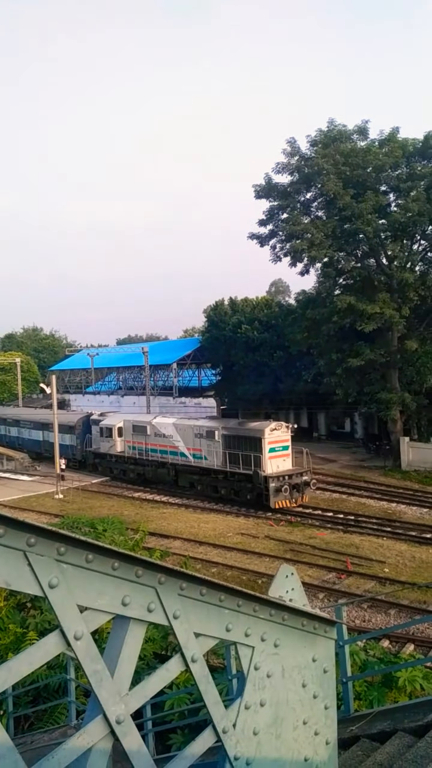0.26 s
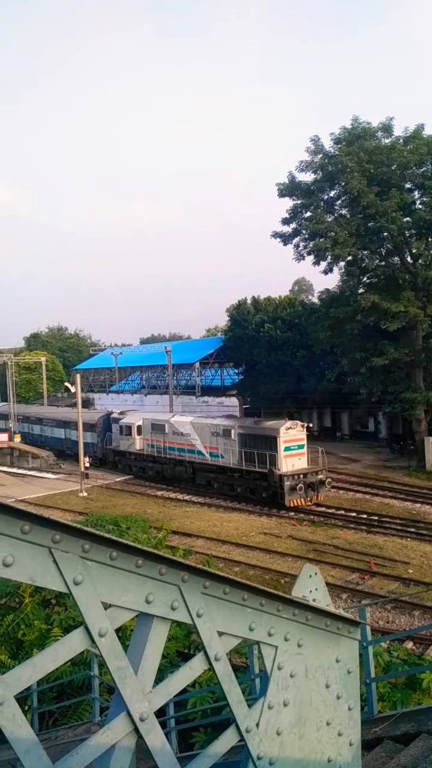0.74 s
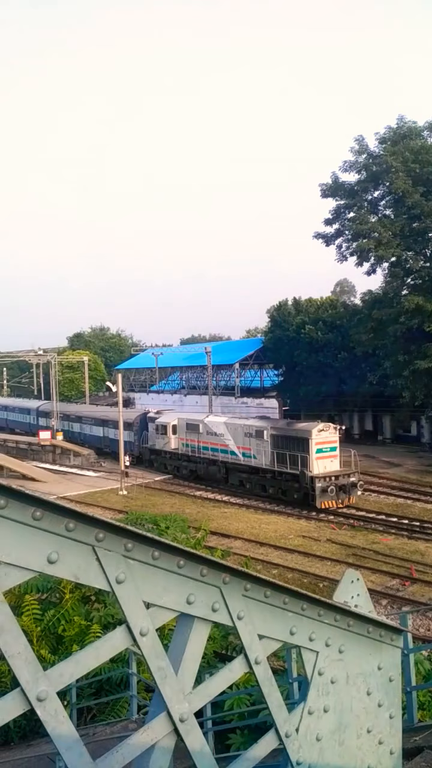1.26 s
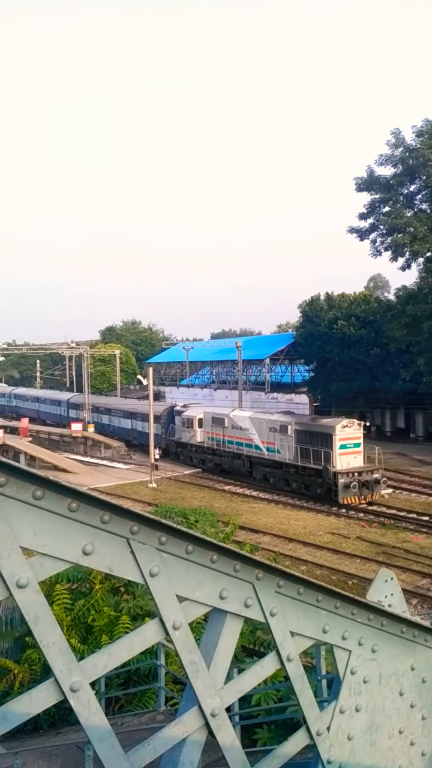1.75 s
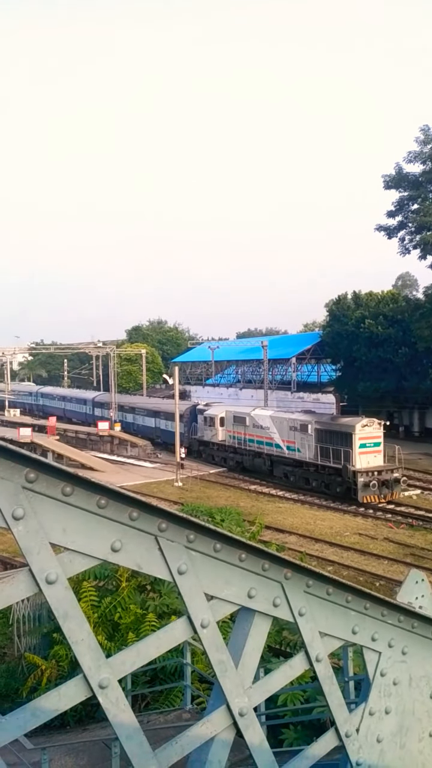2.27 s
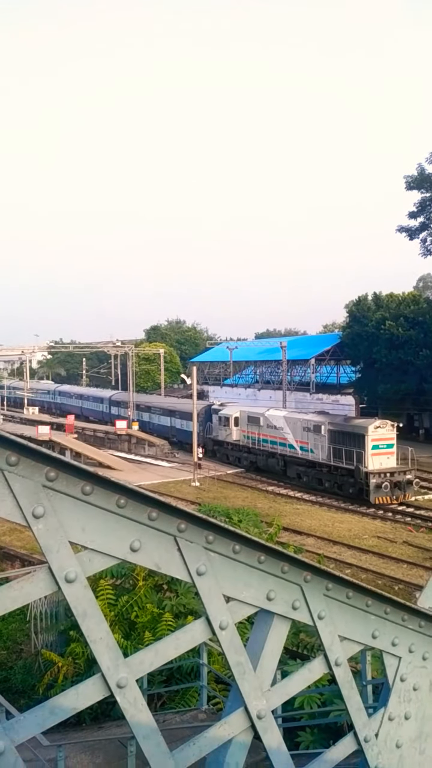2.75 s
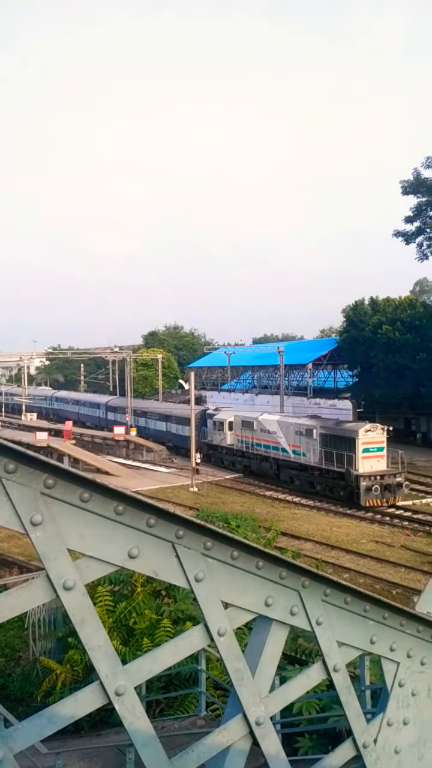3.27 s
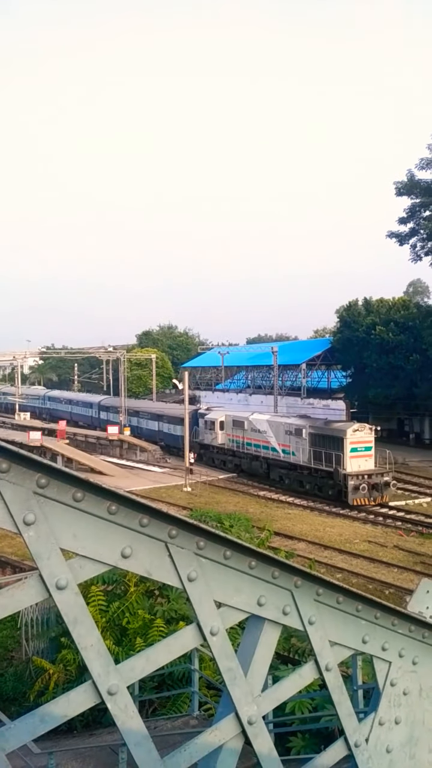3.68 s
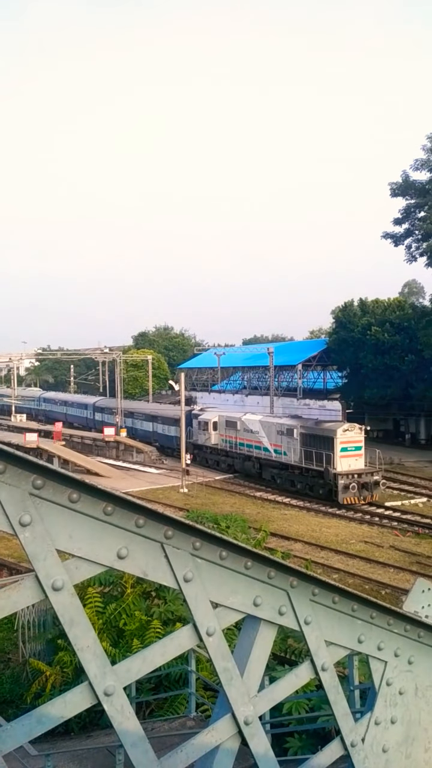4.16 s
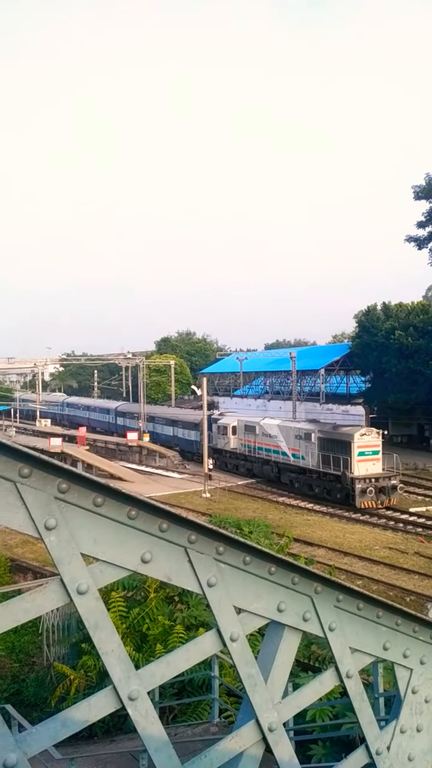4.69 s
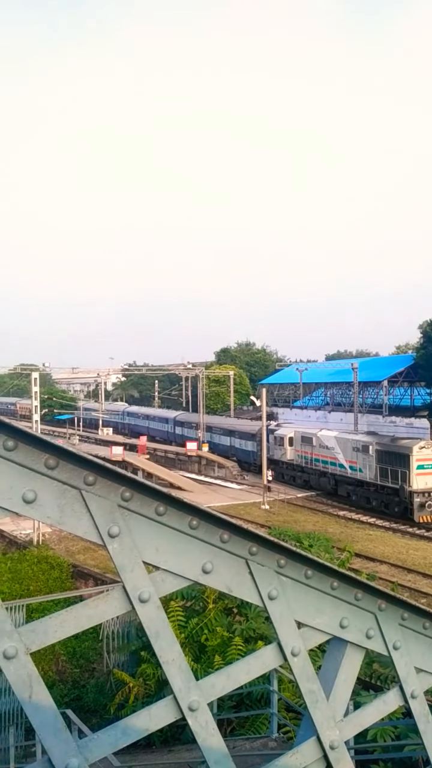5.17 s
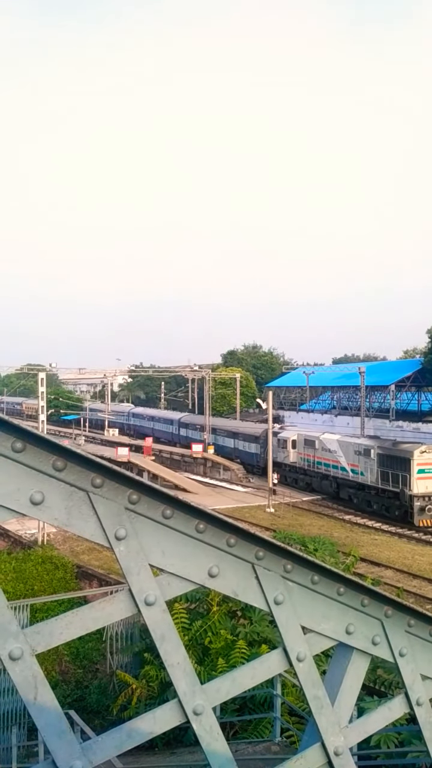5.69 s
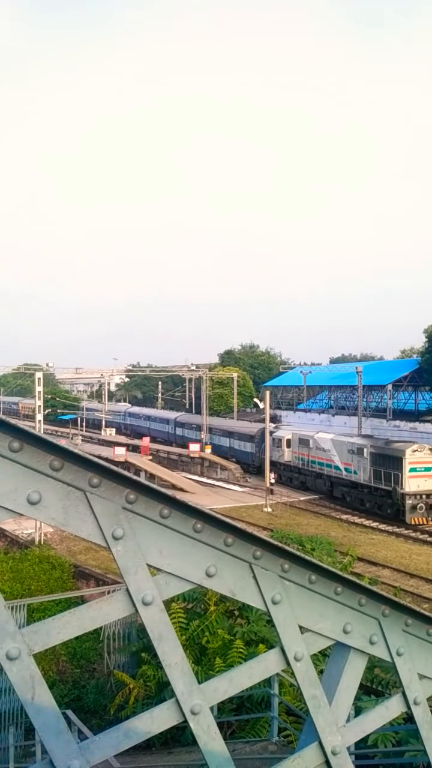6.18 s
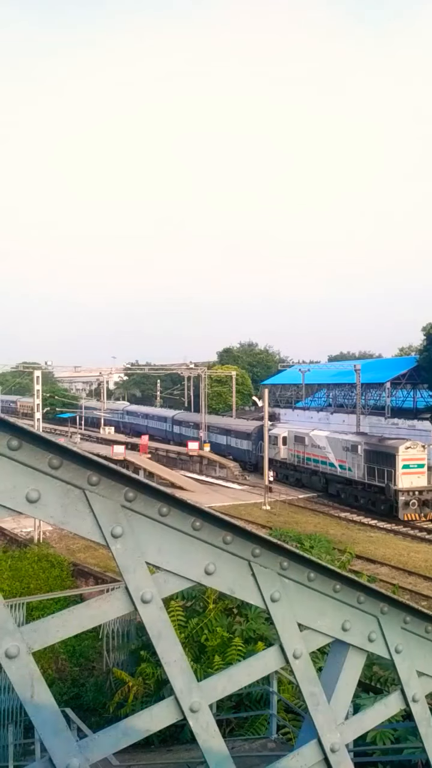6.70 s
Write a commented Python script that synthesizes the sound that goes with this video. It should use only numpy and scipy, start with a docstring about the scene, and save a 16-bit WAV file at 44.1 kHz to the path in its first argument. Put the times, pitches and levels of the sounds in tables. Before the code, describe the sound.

Outdoors at a station yard, heard from a footbridge some way off, a large diesel engine idles with a deep, uneven throb, small air spits and light rattles. A hoarse bird chirps briefly near the start. Past the middle a brake valve ticks open and a bright, loud air hiss swells, holds about a second, then cuts back to a steady weaker bleed until the end.

```python
"""Idling diesel locomotive with a brake-valve air dump

A big two-stroke diesel idles in a station yard, some way below a footbridge: noise puffs, exhaust
resonances and crank orders throb, air spits twice a turn, and something rattles once a turn.
A bird chirps in hoarse sine glides. Then a brake valve cracks open, dumps air in a loud hiss of
coloured noise and falls back to a bleed; fans and the far town are a wavering wash of noise."""
import sys
import numpy as np
from scipy import signal
from scipy.fft import rfft, irfft
from scipy.io import wavfile
from scipy.ndimage import uniform_filter1d

SR = 44100
rng = np.random.default_rng(int(sys.argv[2]) if len(sys.argv) > 2 else 0)


def store_wav(level_fs):
    """Save 16-bit WAV to argv[1]."""
    pcm = np.round(np.clip(np.atleast_2d(level_fs), -1, 1) * 32767)
    wavfile.write(sys.argv[1], SR, pcm.T.astype(np.int16))


N = 305613
T = np.arange(N) / SR
FREQS = np.fft.rfftfreq(N, 1 / SR) + 1e-3  # the offset keeps the logarithm finite at 0 Hz

CRANK_HZ = 3.3315
BEATS_S = (.072, .228)  # the two hard exhaust beats of the first turn
CRACK_S = 4.3835  # the brake valve leaves its seat
VALVE_TRAVEL_S = .066


def undb(db):
    """Decibels to gain."""
    return 10 ** (np.asarray(db) / 20)


def unit(x):
    """Scale to an rms of 1."""
    return x / np.sqrt(np.mean(x ** 2))


def noise():
    """White noise."""
    return rng.standard_normal(N)


def curves(table):
    """Each column of a table, joined by straight lines in time."""
    s, *columns = np.transpose(table)
    return [np.interp(T, s, c) for c in columns]


def walk(rate):
    """Smooth random wander with a spread near 1, from `rate` fresh values per second."""
    k = int(SR / rate)
    steps = np.repeat(rng.standard_normal(N // k + 1), k)
    smooth = uniform_filter1d(uniform_filter1d(steps, k), k)
    return 1.3 * smooth[:N]


def colour(x, points, ripple=()):
    """Shape a sound by a smooth spectrum with local peaks and dips, to an rms of 1."""
    hz, db = np.transpose(points)
    shape_db = np.interp(np.log(FREQS), np.log(hz), db)
    for centre, width, lift in ripple:
        shape_db = shape_db + lift / (1 + (2 * (FREQS - centre) / width) ** 2)
    return unit(irfft(rfft(x) * undb(shape_db), N))


def split(x, edges_hz):
    """Cut a sound into adjoining bands."""
    band = np.searchsorted(edges_hz, FREQS)
    spectrum = rfft(x)
    return [irfft(spectrum * (band == k), N) for k in range(len(edges_hz) + 1)]


def echoes(x, t60, wet_db):
    """Add the scatter from coaches, roofs and trees as a decaying noise tail."""
    t = T[:SR]
    tail = rng.standard_normal(SR) * undb(-60 * t / t60) * (t > .012)
    tail /= np.linalg.norm(tail)
    return x + undb(wet_db) * signal.fftconvolve(x, tail)[:N]


def every_turn(at_s):
    """The times at which the crankshaft comes round to the same angle."""
    return np.arange(at_s, T[-1], 1 / CRANK_HZ)


def once_a_turn(at_s, width_s, scatter_db):
    """A swell at the same crank angle in every turn, its size drawn afresh each time."""
    turns = (T - at_s) * CRANK_HZ + .5
    size = undb(scatter_db * rng.standard_normal(int(N / SR * CRANK_HZ) + 4))
    from_peak_s = (turns % 1 - .5) / CRANK_HZ
    return size[np.floor(turns).astype(int) + 1] * np.exp(-(from_peak_s / width_s) ** 2)


def bursts(source, table, width, skirt_db, decay_s):
    """Short bursts of a noise, each strongest in a band of its own; width is a share of the centre."""
    out = np.zeros(N)
    t = T[:SR // 4]
    hz = np.fft.rfftfreq(len(t), 1 / SR)
    for s, db, held, centre_hz in table:
        span = slice(int(s * SR), int(s * SR) + len(t))
        band = undb(skirt_db) + np.exp(-((hz / centre_hz - 1) / width) ** 2)
        burst = unit(irfft(rfft(source[span]) * band, len(t)))
        attack = 1 - np.exp(-t / 0.0011)
        release = np.exp(-np.maximum(t - held, 0) / decay_s)
        out[span] += undb(db) * burst * attack * release
    return out


def exhaust(count=16, ragged=0.79, puff_s=0.0074):
    """Sixteen cylinders fire once a turn, each with its own puff; two stretches of the turn beat harder."""
    # exhaust stack and engine body: f/Hz, spectral level/dB
    stack = [(30, -37), (41, -10), (50, 8), (72, -21), (88, 6), (106, -11.5), (145, -15.5), (180, 9.5),
             (200, -1), (270, -8), (312, -4.5), (370, -11), (620, -12), (2000, -87)]
    t = T[:SR // 16]
    puffs = rng.standard_normal((count, len(t)))
    gas = np.zeros(N + len(t))
    starts = np.arange(0, N, SR / CRANK_HZ / count).astype(int)
    for k, start in enumerate(starts):
        # the cylinder's own waveform, made ragged by fresh noise at each firing
        puff = puffs[k % count] + ragged * rng.standard_normal(len(t))
        size = undb(1.5 * rng.standard_normal())
        gas[start:start + len(t)] += size * puff * np.exp(-t / puff_s)
    first_beat = .5 * once_a_turn(BEATS_S[0], .025, 1.5)
    second_beat = .35 * once_a_turn(BEATS_S[1], .025, 1.5)
    lope = 1 + first_beat + second_beat
    easing = undb(-.3 * T)  # the exhaust slowly grows quieter
    return undb(-51.5) * easing * colour(gas[:N] * lope, stack)


def thumps():
    """Each beat swells and dies in the three resonances of the exhaust; now and then one is far heavier."""
    # exhaust resonances rung by a firing: nominal f/Hz, swell/s, decay/s
    modes = [(55.6, 0.0084, 0.012), (104.3, 0.014, 0.0048), (185.8, 0.0078, 0.0084)]
    # the heaviest firings: t/s, top resonance level/dB, depth of the lower ones against the top/dB
    heavy = [(.236, -38.5, -20), (.371, -40, 1), (.508, -49, 5), (.669, -40.5, 1), (1.275, -43, -1),
             (1.438, -35, -14), (1.729, -32, -24), (1.869, -35.5, -2), (2.174, -36.5, -20),
             (2.771, -34.5, -16), (3.373, -43, 5), (3.976, -43.5, 4), (4.461, -41, -16), (4.88, -39.5, -13),
             (5.282, -37.5, -22), (6.385, -37.5, -16), (6.798, -41, -14)]
    beat_db, beat_depth_db, scatter_db = -49.5, -4, 2.5  # an ordinary beat
    boom_db = -6  # lowest resonance against the middle one
    beats = np.concatenate([every_turn(s) for s in BEATS_S])
    scatter = rng.standard_normal((len(beats), 2))
    ordinary = [(s, beat_db + scatter_db * size, beat_depth_db + scatter_db * deep)
                for s, (size, deep) in zip(beats, scatter)]
    out = np.zeros(N)
    for s, top_db, depth_db in [*heavy, *ordinary]:
        near = np.abs(T - s) < .1
        t = T[near] - s
        levels_db = top_db + np.array([depth_db + boom_db, depth_db, 0])
        draws = rng.standard_normal((len(modes), 2))
        for (hz, swell, decay), db, (detune, phase) in zip(modes, levels_db, draws):
            # hypot rounds the peak between swell and decay
            ring = np.exp(-np.hypot(t, .004) / np.where(t < 0, swell, decay))
            tone = np.cos(2 * np.pi * hz * (1 + 0.035 * detune) * t + phase)
            out[near] += undb(db) * ring / ring.max() * tone
    return out


def hum():
    """Orders of the crankshaft hum on, swelling twice a turn."""
    # engine tones: multiple of the crank rate, peak level between swells/dB, throb depth
    orders = [(15, -59, .2), (26, -63, .5), (31, -62, .8), (54, -58.5, 1.1)]
    beat = sum(once_a_turn(s, .035, 2) for s in BEATS_S)
    angle = 2 * np.pi * CRANK_HZ * (T + .0004 * walk(5))  # the timing wanders slightly
    out = np.zeros(N)
    for k, db, depth in orders:
        tone = np.sin(k * angle + 2 * np.pi * rng.random())
        out += undb(db) * (1 + depth * beat) * tone
    return out


def spits():
    """Air escapes twice a turn as coloured noise; now and then a spit is longer and louder."""
    # colour of a spit of air: f/Hz, spectral level/dB
    air_colour = [(900, 8), (1400, 6), (2500, 9), (3600, 1), (4900, 3.5), (7400, 3.5), (8800, -11.5),
                  (11000, -3), (12500, -24), (15500, -22)]
    # the strongest spits: t/s, level/dB, held/s, centre f/Hz
    strong = [(.258, -53, .022, 6660), (.362, -51.5, .03, 5960), (.398, -48, .04, 6400),
              (.86, -56, .034, 4400), (1.752, -57, .012, 4600), (2.198, -56.5, .03, 5560),
              (2.635, -53.5, .058, 5100), (2.793, -49.5, .025, 6750), (2.952, -53, .018, 5160),
              (3.552, -46.5, .0081, 5360), (3.853, -52.5, .013, 7460), (3.996, -54, .015, 7000),
              (4.162, -55, .013, 5540)]
    lag_s = .036  # after each of the two exhaust beats of a turn
    swells = sum(once_a_turn(s + lag_s, .016, scatter_db=1.5) for s in BEATS_S)
    regular = undb(-57.5) * colour(noise(), air_colour) * swells
    clear = bursts(colour(noise(), air_colour), strong, width=0.24, skirt_db=-11.5, decay_s=.02)
    return echoes(regular + clear, 0.37, -9)


def rattles(count=60):
    """Noise bursts: a light rattle in every turn, a few clear ones and many faint, softened by distance."""
    # the clearest rattles: t/s, level/dB, held/s, centre f/Hz
    clear = [(.215, -60, .085, 2720), (.255, -52, .01, 1460), (.37, -55.5, .11, 3000),
             (.56, -55, .014, 2870), (.858, -54, .019, 2070), (1.425, -53.5, .023, 2180),
             (2.68, -59, .044, 1090), (3.174, -52, .032, 516), (3.855, -56, .025, 1480)]
    last_s = T[-1] - .3
    faint = [(s * last_s, -64.5 + 6 * size, .015, 400 * 6 ** pitch)
             for s, size, pitch in rng.random((count, 3))]
    lag_s, level_db, held_s, centre_hz = .025, -64, .016, 1500  # follows the second beat of a turn
    regular = [(s, level_db + 2 * rng.standard_normal(), held_s, centre_hz)
               for s in every_turn(BEATS_S[1] + lag_s) if s < last_s]
    dry_rattles = bursts(noise(), [*clear, *regular, *faint], width=.22, skirt_db=-42, decay_s=.014)
    return echoes(dry_rattles, .4, -8)


def opening(start_s, build_s):
    """Flow from 0 to 1: the valve lifts, then pressure builds in the vent pipe."""
    t = np.maximum(T - start_s, 0)
    return np.minimum(t / VALVE_TRAVEL_S, 1) * (1 - np.exp(-t / build_s))


def gush(db, start_s, build_s, cut_s, fall_db_per_s):
    """One part of the blast builds up, holds, and falls away when the valve cuts it off."""
    fall_db = fall_db_per_s * np.maximum(T - cut_s, 0)
    return opening(start_s, build_s) * undb(db - fall_db)


def air_release():
    """A turbulent jet is noise of a rippled colour; its roar stops first as the valve closes to a bleed."""
    # colour of the open valve, then of the bleed: f/Hz, spectral level/dB
    jet = [(900, -48.5), (1120, -46), (1280, -25.5), (2100, -26), (3000, -20.5), (4300, -15.5),
           (5600, -10.5), (6400, 3.2), (7700, 5.5), (8500, -5.5), (9300, -14), (10700, -12.5),
           (11800, -21.5), (15600, -22.5)]
    bleed_colour = [(800, -21), (1120, -21), (1300, -19), (2100, -15), (3000, -17), (4300, -13.5),
                    (5600, -11.5), (6400, 4), (7700, 6.5), (8500, -1.5), (9300, -8), (10600, -8.5),
                    (11800, -15.5), (15600, -17.5)]
    # fixed ripple in the colour of the hiss, peaks and dips: f/Hz, width/Hz, lift or dip/dB
    hiss_ripple = [(1326, 85, 8.5), (1613, 254, 13), (1860, 80, 7), (2094, 84, 7), (2390, 216, 10),
                   (2647, 55, 10), (2866, 97, 10), (3060, 230, 9.5), (3223, 75, 6.5), (3510, 153, 12.5),
                   (3663, 160, 7.5), (3935, 340, 9), (4227, 52, 7), (4374, 290, 12), (4655, 77, 8.5),
                   (4930, 280, 9.5), (5396, 320, 10.5), (5670, 335, 7.5), (6090, 70, 8.5), (6490, 35, 7),
                   (6330, 35, 4), (7140, 76, 3), (7650, 50, 2), (8768, 50, -6), (10100, 81, -11),
                   (9800, 40, -10), (10200, 310, 0)]
    # the bleed once the blast is over: t/s, level/dB
    bleed_level = [(5.7, -35), (6.03, -36.3), (6.42, -33.8), (6.65, -34), (6.93, -35.3)]
    low, body, hiss, sizzle = split(colour(noise(), jet, hiss_ripple), [2500, 5100, 8900])
    # the largest eddies make the lowest band the most ragged
    roar = unit(low * undb(1.4 * walk(28)) + body * undb(.7 * walk(50)))
    blast = roar * gush(db=-27.3, start_s=4.402, build_s=.17, cut_s=5.565, fall_db_per_s=220)
    blast += unit(hiss) * gush(db=-17.2, start_s=4.392, build_s=.27, cut_s=5.62, fall_db_per_s=300)
    blast += unit(sizzle) * gush(db=-29.5, start_s=4.385, build_s=.38, cut_s=5.628, fall_db_per_s=330)
    blast *= undb(.6 * walk(150) + .4 * walk(35))  # flutter
    bleed_db, = curves(bleed_level)
    bands = split(colour(noise(), bleed_colour, hiss_ripple), [2800, 5140, 7000, 9050])
    bleed = sum(b * undb(.6 * walk(22)) for b in bands)
    bleed *= undb(bleed_db) * opening(CRACK_S, build_s=.12)
    return echoes(blast, 0.46, -17.5) + bleed


def valve_crack(seep_db=-50, seep_s=.12):
    """A thin tick of air as the valve leaves its seat, then a brief seep through the narrow gap."""
    # colour of the tick and seep: f/Hz, spectral level/dB
    tick_colour = [(1500, -27), (3500, -15), (7000, 3), (10500, -9), (15500, -24)]
    t = np.maximum(T - CRACK_S, 0)
    tick = undb(-37.5) * np.exp(-t / .007)
    seep = undb(seep_db) * np.exp(-t / seep_s)
    return colour(noise(), tick_colour) * np.hypot(tick, seep) * (T > CRACK_S)


def bird():
    """Short hoarse glides from the trees: sines with a wavering pitch and a rasping level."""
    # bird notes: t/s, length/s, start f/Hz, end f/Hz (both before the waver), level/dB
    chirps = [(0.805, 0.042, 3040, 3120, -49.5), (0.882, 0.014, 3150, 3800, -46),
              (0.887, 0.037, 3640, 3180, -48), (0.93, 0.046, 2790, 2640, -42.5),
              (1.348, .045, 2480, 2830, -57)]
    out = np.zeros(N)
    for s, length, start_hz, end_hz, db in chirps:
        on = (T > s) & (T < s + length)
        u = (T[on] - s) / length
        glide_hz = start_hz + (end_hz - start_hz) * u
        hz = glide_hz * (1 + .033 * walk(1500)[on])
        rasp = 1 + .4 * walk(3000)[on]
        swell = np.sin(np.pi * u ** .7)
        out[on] += undb(db) * rasp * swell * np.sin(2 * np.pi * np.cumsum(hz) / SR)
    return echoes(out, .35, -8)


def yard():
    """Fans and the far town: a soft noise wash whose bands, all but the top one, waver on their own."""
    # fans, machinery and the town around: f/Hz, spectral level/dB
    wash_colour = [(30, -15), (60, -4.5), (180, -5), (270, -17), (630, -11), (720, -23), (1250, -22.5),
                   (1900, -23), (2550, -21.5), (2900, -27), (4100, -29.5), (4700, -25), (7400, -27),
                   (8700, -37.5), (11200, -39), (15600, -45)]
    # fixed ripple in the colour of the fans, peaks and a dip: f/Hz, width/Hz, lift or dip/dB
    fan_ripple = [(340, 17, 2.5), (593, 47, -2), (890, 50, 5), (985, 48, 6.5), (1830, 140, 5.5)]
    *lower, top = split(colour(noise(), wash_colour, fan_ripple), [260, 450, 750, 1200, 1900, 3000])
    wavering = sum(b * undb(1.5 * walk(14) + 1.4 * walk(2.71)) for b in lower)
    return undb(-51.0) * (wavering + top)


def scene():
    """Everything is far enough away to arrive alike in both channels."""
    engine = exhaust() + thumps() + hum() + spits() + rattles()
    brake = air_release() + valve_crack()
    mix = engine + brake + bird() + yard()
    return np.array([mix, mix])


def record(dry):
    """The phone drops the deepest bass below 36 Hz and cuts the top above 15.75 kHz."""
    bass_cut = signal.butter(4, 36, "high", fs=SR, output="sos")
    top_cut = signal.ellip(12, .1, 80, 15750, fs=SR, output="sos")
    thin = signal.sosfilt(bass_cut, dry)
    return signal.sosfilt(top_cut, thin)


dry = scene()
out = record(dry)
store_wav(out)
```